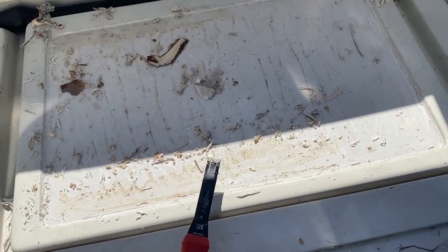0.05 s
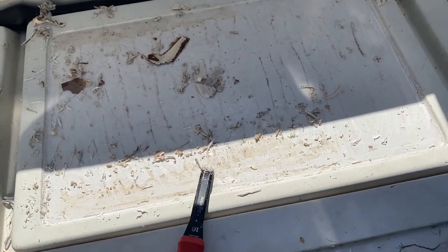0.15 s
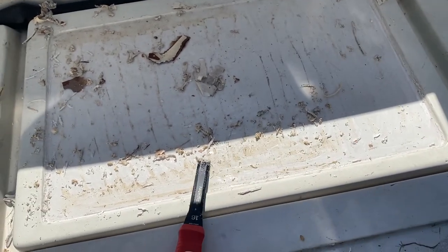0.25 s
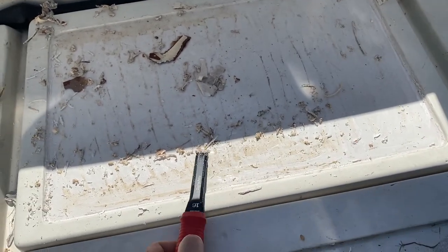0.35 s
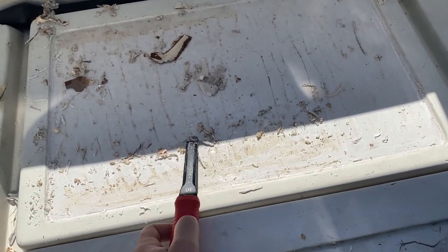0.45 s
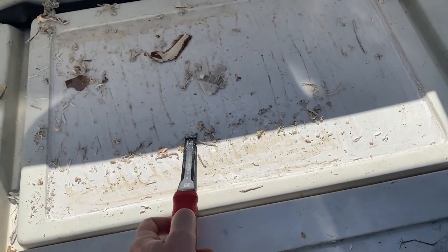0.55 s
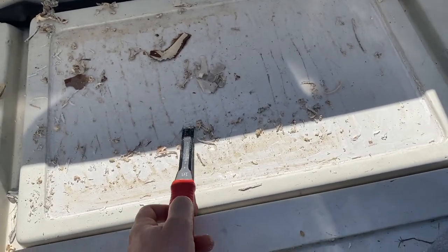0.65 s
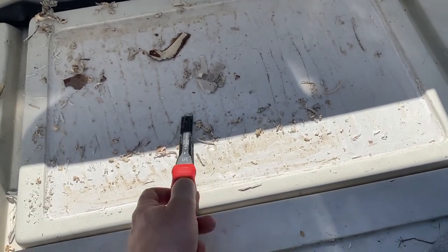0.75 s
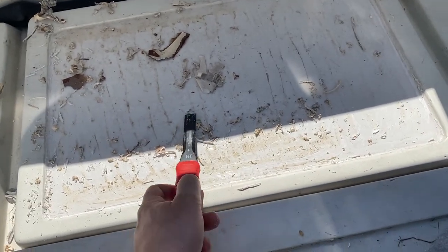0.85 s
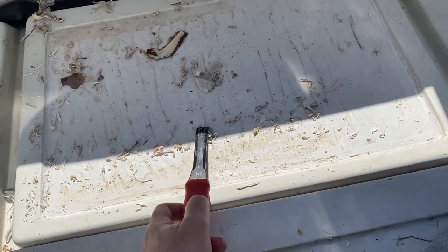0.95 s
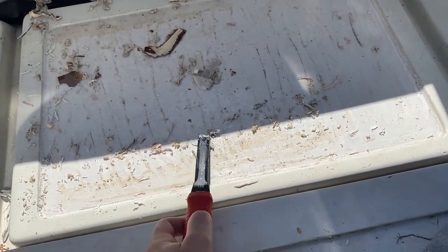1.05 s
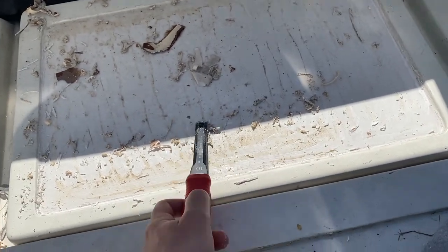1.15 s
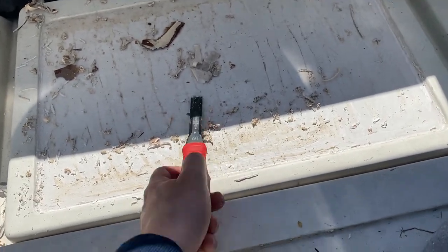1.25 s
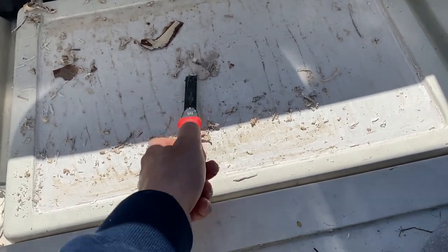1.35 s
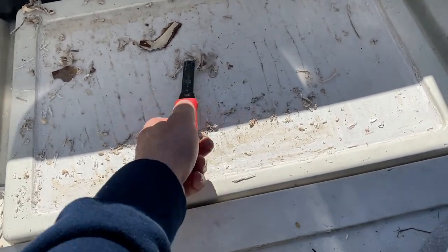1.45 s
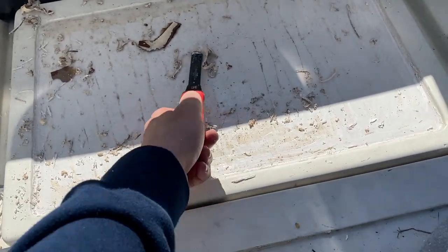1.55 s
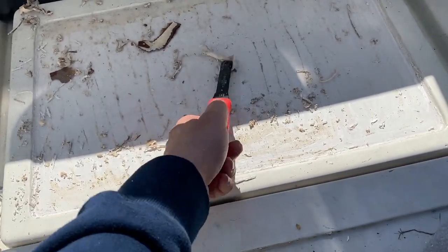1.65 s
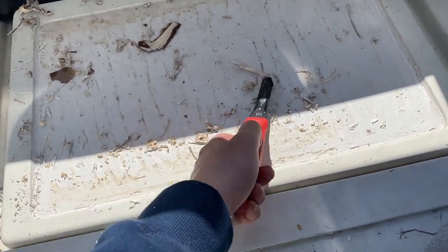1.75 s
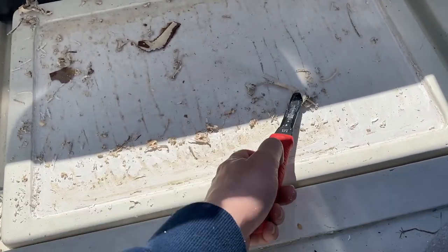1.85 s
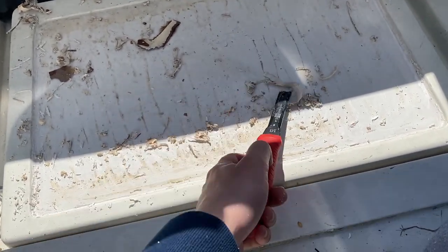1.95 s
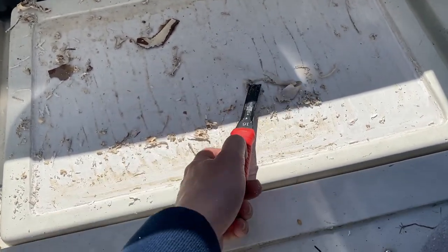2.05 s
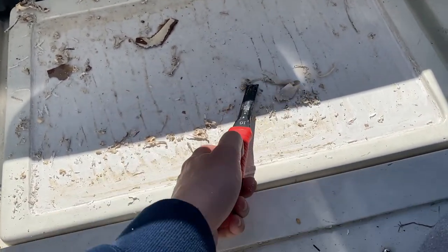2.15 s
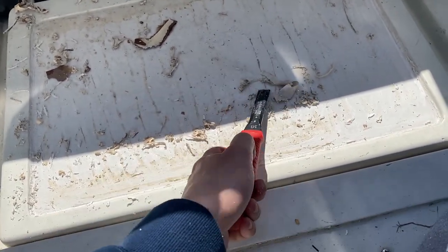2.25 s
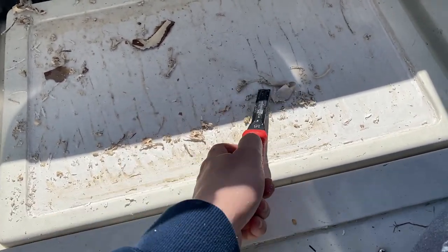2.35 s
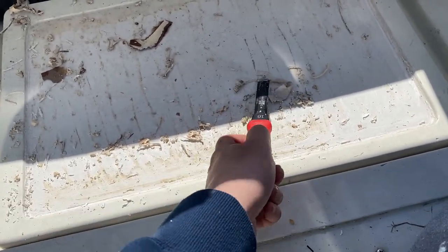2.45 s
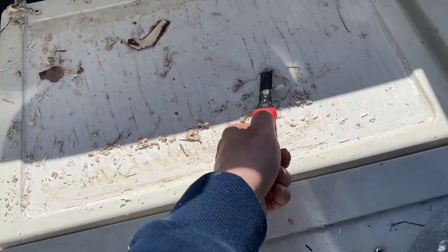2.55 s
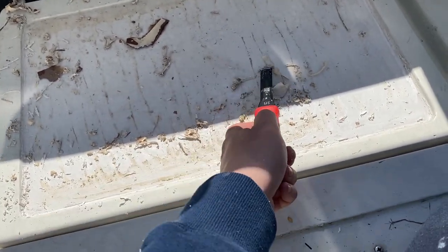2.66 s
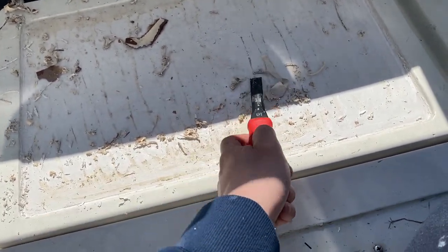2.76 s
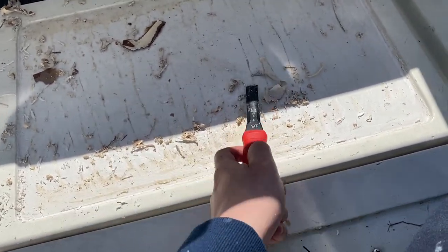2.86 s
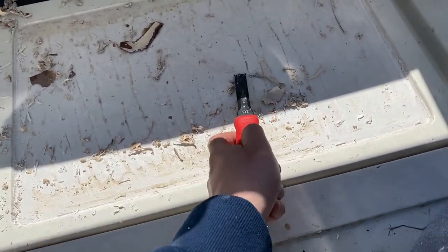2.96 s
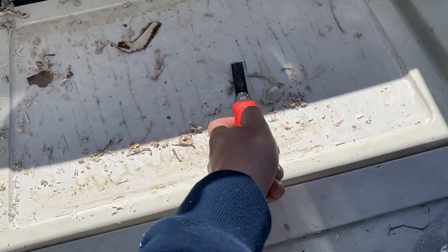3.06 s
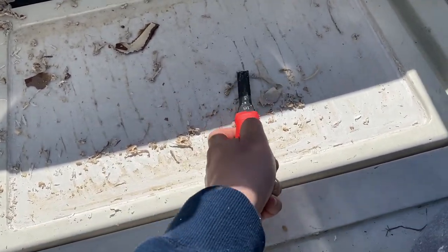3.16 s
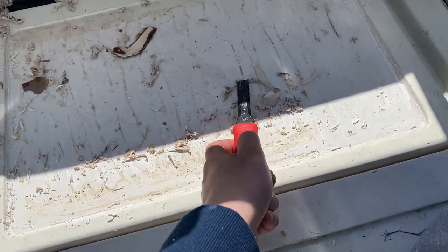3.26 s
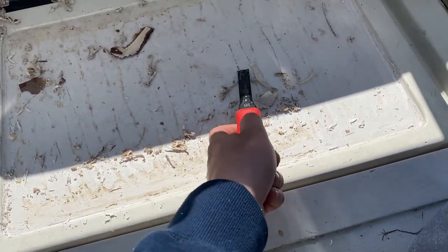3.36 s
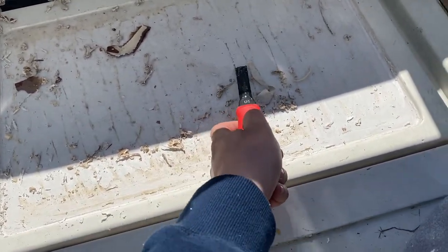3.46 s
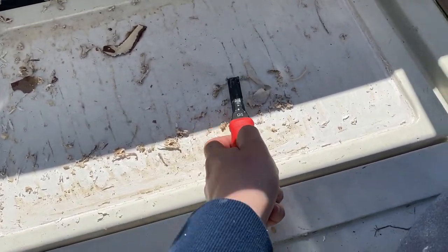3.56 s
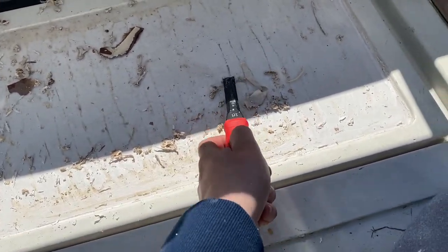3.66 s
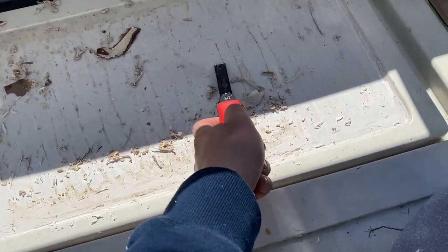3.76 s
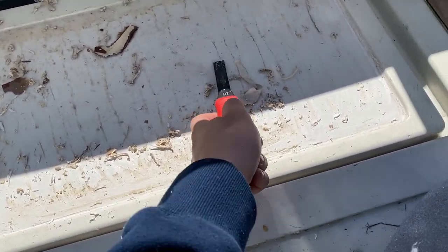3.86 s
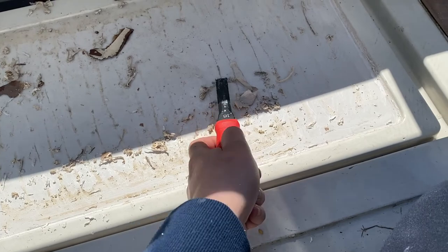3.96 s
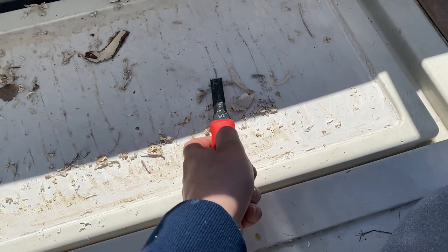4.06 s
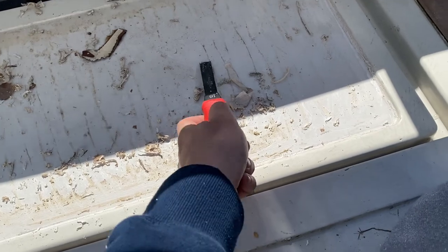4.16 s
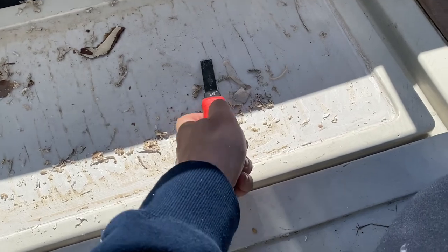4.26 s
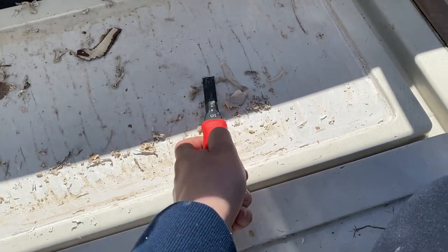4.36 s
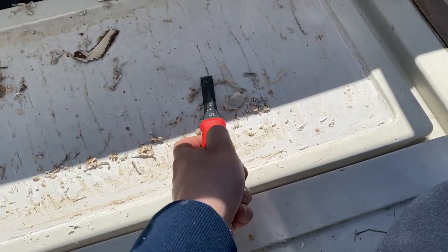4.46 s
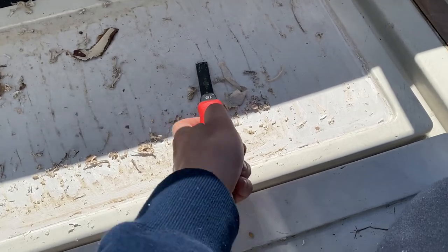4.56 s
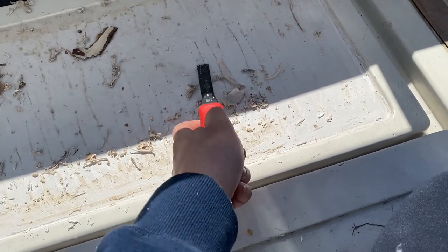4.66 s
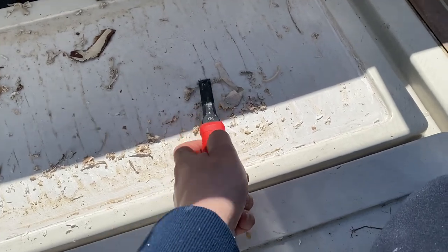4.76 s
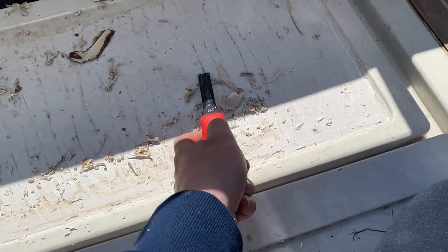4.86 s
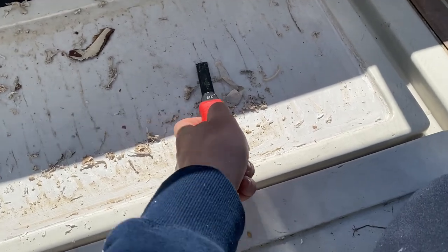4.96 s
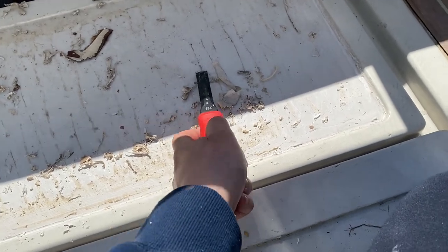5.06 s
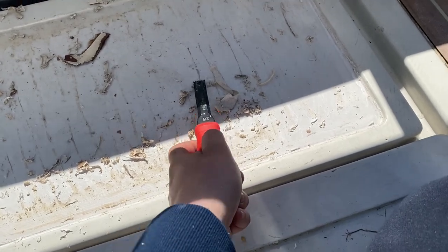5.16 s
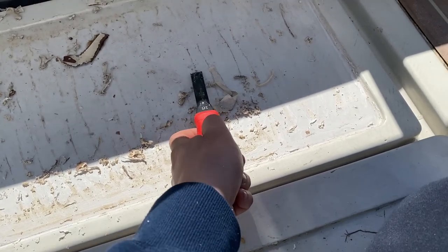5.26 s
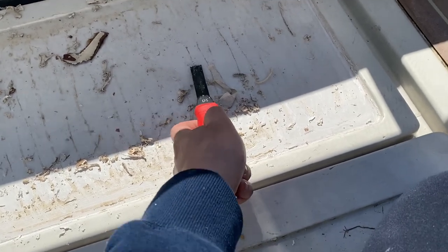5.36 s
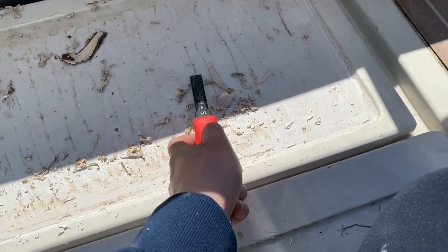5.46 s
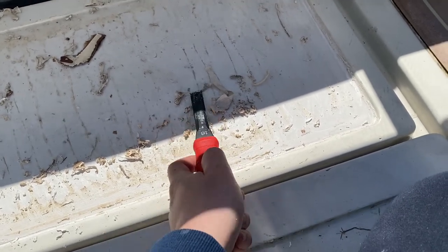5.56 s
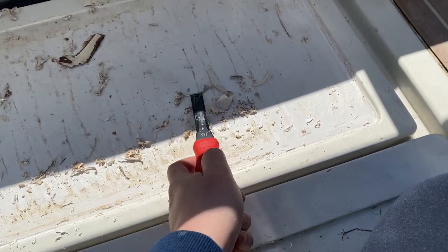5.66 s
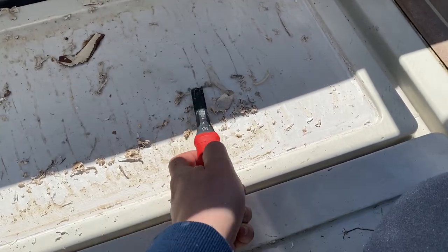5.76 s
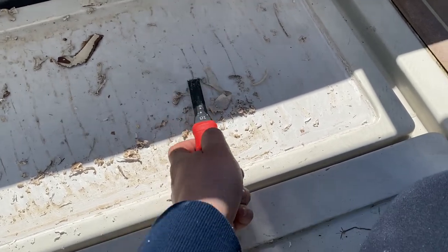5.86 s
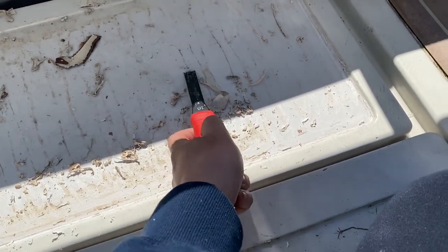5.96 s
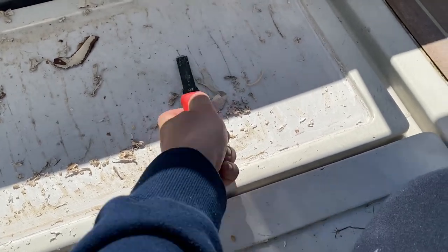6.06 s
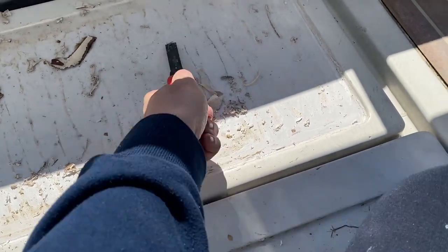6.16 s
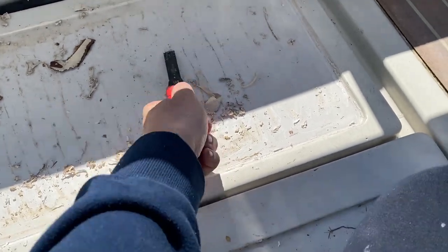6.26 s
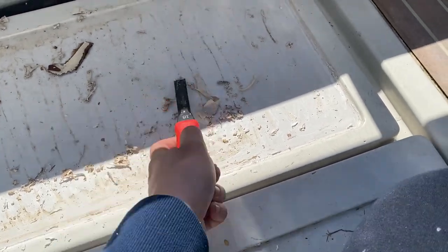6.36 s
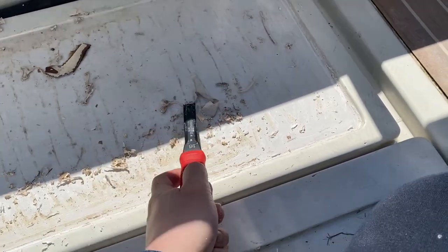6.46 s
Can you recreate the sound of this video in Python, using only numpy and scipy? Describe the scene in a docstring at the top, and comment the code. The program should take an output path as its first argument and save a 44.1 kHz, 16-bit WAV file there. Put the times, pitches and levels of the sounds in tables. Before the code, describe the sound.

Rapid dry scraping of a metal edge on a hollow plastic-like panel, with snags, crumb snaps and dull knocks, close up outdoors.

```python
"""Scraping glue off a hollow deck

A narrow steel blade is set down on a hollow fiberglass deck and scrapes off glue in quick strokes.
Random slips of its edge shake the hull, the deck panel, the deck skin and the blade, each a filter
that rings; the further force outweighs grit, the lower the steady chatter. Snags, snapping crumbs and
low thumps join in. Two close microphone ports hear it with short echoes in a quiet, rumbling yard."""
import sys
import numpy as np
from scipy import signal
from scipy.fft import rfft, irfft, next_fast_len
from scipy.io import wavfile
from scipy.ndimage import uniform_filter1d

SR = 44100
rng = np.random.default_rng(int(sys.argv[2]) if len(sys.argv) > 2 else 0)


def master(y):
    """Save y as 16-bit WAV."""
    cut = np.clip(np.atleast_2d(y).T, -1, 1)
    pcm = np.round(cut * 32767)  # scale
    wavfile.write(sys.argv[1], SR, pcm.astype(np.int16))


N = 287532  # length in samples
SIZE = next_fast_len(N + 8192)  # transform length with room for tails
FULL_HZ = np.fft.rfftfreq(SIZE, 1 / SR)
BODY_HZ = np.fft.rfftfreq(8192, 1 / SR)


def gain_of(db):
    """Turns decibels into gain."""
    return 10 ** (np.asarray(db) / 20)


def evened(x):
    """Scales a signal to rms 1."""
    return x / np.sqrt(np.mean(x ** 2) + 1e-20)


def read(points, hz):
    """Reads a spectrum table on a log-frequency axis."""
    f, value = np.transpose(points)
    return np.interp(np.log(hz + 1), np.log(f + 1), value)


def curve(rows, column):
    """Draws one column of a time table as a value for every sample."""
    rows = np.asarray(rows)
    return np.interp(np.arange(N) / SR, rows[:, 0], rows[:, column])


# Spectrum of the yard noise: [f/Hz, relative level/dB per Hz]
YARD_SPECTRUM = [(18, -59), (30, -41), (59, 13), (146, -61), (187, -17), (317, -1), (350, -10),
                 (536, -16.5), (578, -14), (761, -28.5), (12000, -53), (15600, -93), (22000, -120)]


def yard():
    """Faint distant rumble: filtered noise, partly shared by the two ports."""
    level_db = -54
    shared, own = rng.standard_normal(SIZE), rng.standard_normal((2, SIZE))
    colour = gain_of(read(YARD_SPECTRUM, FULL_HZ))
    rumble = irfft(rfft(shared + 0.69 * own) * colour, SIZE)[:, :N]
    return gain_of(level_db) * evened(rumble)


# Starting strength of each echo: [f/Hz, level/dB]
ECHO_LEVEL = [(100, -64), (400, -21), (1500, -29), (4000, -20.5), (9000, -16), (13000, -30)]
# Time the echoes take to fade by 60 dB: [f/Hz, fade time/s]
ECHO_FADE = [(100, 0.27), (1000, 0.12), (8000, 0.06)]


def cockpit(x):
    """Sparse reflections off the raised sides, different for each port, weak in bass and treble."""
    taps = rng.standard_normal((2, 11025)) * (rng.random((2, 11025)) < 0.05)
    taps[:, :90] = 0  # the first echo needs time to arrive
    hz, t, z = signal.stft(taps, SR, nperseg=256)
    fade_db = -60 * t / read(ECHO_FADE, hz)[:, None] + read(ECHO_LEVEL, hz)[:, None]
    tail = signal.istft(z * gain_of(fade_db), SR, nperseg=256)[1]
    return signal.oaconvolve(x[None], tail, axes=1)[:, :N]


# Phase of left over right; above 12 kHz the sides are held opposite: [f/Hz, phase/radians]
SIDE_PHASE = [(0, 0), (300, -.4), (480, -1.3), (1000, -1.0), (1330, -1.0), (1520, .5), (1900, .1),
              (2330, 0), (2930, 2.9), (3550, -.1), (3960, 1.5), (4300, 1.3), (4750, 3.1), (5340, 6.4),
              (6370, 7.3), (8800, 8.2), (10100, 8.7), (11000, 9.3), (12200, 9.42), (22050, 9.42)]
# Level of the left port over the right: [f/Hz, level/dB]
PORT_LEAN = [(60, -0.5), (110, 2), (200, 1.5), (380, 5), (700, -4.5), (1290, 0), (2380, -2.5), (4400, -0.5),
             (8120, 0.5), (15000, -0.5)]


def ports(x):
    """Makes the sound of the two ports: left and right differ in phase and level by frequency."""
    phase = np.interp(FULL_HZ, *np.transpose(SIDE_PHASE))
    half = gain_of(read(PORT_LEAN, FULL_HZ) / 2) * np.exp(0.5j * phase)  # half for each port
    return irfft(rfft(x, SIZE) * np.array([half, 1 / half]), SIZE)[:, :N]


# How far the phase between the ports drifts (rms): [f/Hz, drift/radians]
PHASE_DRIFT = [(300, 0.038), (600, 0.7), (1300, 1.14), (1900, 0.4), (2800, 2.28), (3700, 2.5), (4700, 0.61),
               (6500, 0.45), (9000, 0.36), (11500, 0.68), (13000, .1)]
# Where the edge works, from mid-panel 0 to the rim 1: [t/s, place 0-1]
EDGE_PLACE = [(0.2, 0.29), (0.36, 0.83), (1.2, 0.64), (2.2, 0.61), (2.4, 0.02), (2.9, 0.43), (3.3, 0.2),
              (5.6, 0.16), (6.52, 0.19)]
# Bands that gain or lose level near the rim: [f/Hz, width/Hz, level/dB]
RIM_BANDS = [(445, 225, -24), (726, 160, 10), (1030, 310, -10.5), (1372, 66, -20), (1570, 94, 10),
             (2120, 560, -3.5), (2275, 110, 12.5)]


def travel(pair):
    """As the edge travels, other modes are touched and the port paths change: drifting patches."""
    colour_db = 3.0
    hz, t, z = signal.stft(pair, SR, nperseg=512, noverlap=384)
    patches = rng.standard_normal((2, len(hz), len(t)))
    patches = uniform_filter1d(patches, 3, 1)
    patches = evened(uniform_filter1d(uniform_filter1d(patches, 14, 2), 14, 2))
    reach = (hz ** 2 / (hz ** 2 + 1270.0 ** 2))[:, None]  # long waves do not care where the edge is
    rim_db = sum(db * np.exp(-2 * ((hz - f) / width) ** 2) for f, width, db in RIM_BANDS)
    place_db = np.outer(rim_db, np.interp(t, *np.transpose(EDGE_PLACE)))
    place_db = place_db + colour_db * reach * patches[0]
    drift = read(PHASE_DRIFT, hz)[:, None] * patches[1]
    z *= gain_of(place_db) * np.exp(np.multiply.outer([0.5j, -0.5j], drift))
    return signal.istft(z, SR, nperseg=512, noverlap=384)[1][:, :N]


# The hand's shove stops short; hull and panel thump: [t/s, level/dB before a common lift, f/Hz]
LOW_THUMPS = [(0.177, -12.5, 191), (0.196, -27, 61.6), (0.697, -33, 100), (0.733, -20, 76.7),
              (0.815, -29, 111), (0.874, -30, 230), (0.881, -36, 104), (0.983, -21.5, 90),
              (1.104, -22.5, 79.5), (1.223, -50, 87), (1.374, -18, 218), (1.52, -25.5, 75),
              (1.606, -25, 240), (1.643, -19, 240), (1.695, -38, 147), (1.704, -26, 220), (1.773, -23, 240),
              (1.948, -31, 146), (2.06, -29, 101.5), (2.574, -31, 227), (2.83, -29, 52), (2.988, -28, 76.5),
              (3.228, -29, 90), (3.36, -29, 60), (3.397, -32, 300), (3.44, -28, 96), (3.683, -20.5, 88),
              (3.962, -27.5, 93), (4.044, -25, 200), (4.099, -31, 212), (4.285, -27, 200), (4.51, -43, 210),
              (4.655, -24, 190), (4.67, -30, 80.6), (4.907, -23.5, 91), (5.414, -27.5, 91.5),
              (6.029, -36, 102), (6.133, -16, 251), (6.304, -37, 114)]


def thumps():
    """Low swings of hull and panel: each sine swells at once and dies away over a few cycles."""
    turns, early_s, lift_db = 1.34, 0.00597, 5.5  # each starts a little ahead of its table time
    out = np.zeros(N + 4096)
    for s, db, hz in LOW_THUMPS:
        cycles = np.arange(4096) * hz / SR
        swell = cycles / turns * np.exp(1 - 2 * cycles / turns)
        start = round((s - early_s) * SR)
        out[start:start + 4096] += gain_of(db + lift_db) * np.sin(2 * np.pi * cycles) * swell
    return out[:N]


def blows(rows, level_db, length_s):
    """Short bursts of force: a first jerk and a dying noise rattle."""
    jerk = 0.48
    force, t = np.zeros(N + 2048), np.arange(2048) / SR
    rattle = rng.standard_normal((len(rows), 2048)) * np.exp(-t / length_s)
    rattle *= np.sqrt(length_s * SR / 2) / np.linalg.norm(rattle, axis=1, keepdims=True)
    rattle[:, 0] = jerk * np.sqrt(length_s * SR)
    for row, db, burst in zip(rows, level_db, rattle):
        start = round(row[0] * SR)
        force[start:start + 2048] += gain_of(db) * burst
    return force[:N]


# Crumbs of glue snapping off: [t/s, level/dB before a common trim]
GLUE_CRUMBS = [(0.3262, -33.5), (0.402, -39), (0.413, -37), (0.799, -44), (0.945, -22.5), (0.995, -23),
               (1.006, -26), (1.577, -36), (1.975, -34), (2.7017, -38), (3.2345, -48), (3.7579, -45),
               (3.8855, -32), (3.9893, -57), (4.2634, -27), (4.3125, -49), (4.621, -25), (4.751, -39),
               (4.959, -43), (5.005, -51), (5.428, -27), (5.458, -24), (5.542, -25), (6.123, -19.5),
               (6.3885, -14)]


def crumbs():
    """A crumb is small and snaps high: short bursts kept to the treble."""
    snaps = blows(GLUE_CRUMBS, np.transpose(GLUE_CRUMBS)[1] - 5, 0.0027)
    treble = signal.butter(2, (4500, 15500), "bandpass", fs=SR, output="sos")
    return signal.sosfilt(treble, snaps)


# The edge lands or snags: [t/s, blow level/dB, panel and blade level/dB against the blow],
# all before the trim of each part
EDGE_SNAGS = [(0.165, -13.5, -6, -26), (0.173, -10, 7, -38), (0.226, -27, 4, -44), (0.357, -33, 15, -22),
              (0.402, -38, -2, -20), (0.742, -28.5, -6, -34), (0.84, -41, -18, -11), (0.865, -33, 7, -8),
              (0.922, -32, 15.5, -9), (0.997, -30.5, -33, 2.5), (1.092, -39, -18, -27),
              (1.133, -27, -32, -31), (1.277, -22, -17, -32), (1.437, -32, 15.5, -4.5),
              (1.508, -35.5, -14, -34), (1.603, -28.5, 22, -27), (1.699, -31, 4, -1), (1.735, -43, 3, 8),
              (1.765, -37, 9, 1), (1.945, -34, 24.5, -9), (2.322, -45, 6, -8), (2.364, -34, -6, -30),
              (2.447, -30, -27, -27), (2.552, -34, -8, -9), (2.737, -34.5, -13, -23),
              (2.856, -39.5, 5, -36), (2.973, -42, -19, 14), (3.093, -32.5, -21, -5),
              (3.273, -26, -24, -11), (3.624, -42, 2, -25), (3.668, -27, -8, -30), (3.971, -29.5, 2, -13),
              (4.013, -35, 15, -25), (4.078, -46, -3, 10), (4.12, -40, -20, -19), (4.204, -34, -14, -14),
              (4.25, -25.5, -24, -0.5), (4.315, -31, 1, -28), (4.408, -36, 19, -24), (4.503, -43, -4, -18),
              (4.599, -49, -14, 11), (4.675, -42.5, -7, 15), (4.775, -52, -14, -28), (4.801, -25, -5, -13),
              (5.012, -35, 7, -1.5), (5.07, -29.5, -2, -26), (5.152, -44, 27.5, -33),
              (5.165, -24, -18, -34), (5.208, -26.5, -18, -6), (5.666, -32, -18, -20),
              (5.89, -19.5, -10, -30), (5.9021, -30, -8, -24), (6.124, -16, 5, -10), (6.19, -30.5, 6, -26),
              (6.224, -29.5, 12.5, -23.5), (6.31, -41, -3, 17), (6.376, -21.5, -20, 6.5)]


def snags(part, trim_db, length_s):
    """The blows of the landing or snagging edge, as one part of the body feels them."""
    _, blow_db, panel_db, blade_db = np.transpose(EDGE_SNAGS)
    against_blow_db = {"deck": 0, "panel": panel_db, "blade": blade_db}[part]
    return blows(EDGE_SNAGS, blow_db + against_blow_db + trim_db, length_s)


# Modes of deck and blade, before widening and pitch shift: [f/Hz, width/Hz, relative level/dB]
BODY_MODES = [(61.7, 11, -7), (230, 110, -26), (730, 45.4, -11), (1016.7, 82, -6), (1215, 20, -13),
              (1594, 118, -14.5), (2076, 15, -15.5), (2507, 196, -23), (2937, 38, -22.5),
              (3940, 177, -29.5), (6124, 190, -28), (6600, 830, -32), (9540, 290, -36), (55.7, 16.5, 10.5),
              (90, 12, -22), (256, 26, -1), (321, 63, -1.5), (432, 30, -4.5), (595, 137, -16.5),
              (864, 50, -42), (1472, 60, -14.5), (1620, 80, -46), (1840, 64, -17.5), (3580, 100, -30.5)]
# What sounds between the modes, before a common trim: [f/Hz, relative level/dB per Hz]
BETWEEN_MODES = [(15, -20), (30, -29), (59, 9.5), (157, -4), (212, 10.5), (439, -4.5), (489, -23),
                 (1020, -10.5), (1130, -15.5), (1560, -12), (1940, -21.5), (4030, -28.5), (4740, -25.5),
                 (6560, -27), (16000, -39)]


def body(lo_hz, hi_hz, pitch=1):
    """Ring of deck and blade between two frequencies, energy 1, starting at once (minimum phase)."""
    between_db, least_width_hz = -7.5, 36
    power = gain_of(2 * (read(BETWEEN_MODES, BODY_HZ) + between_db))
    for hz, width, db in BODY_MODES:
        width = max(width, min(least_width_hz, hz / 3))  # narrow modes are broadened so that none rings on as a long thin line
        power = power + gain_of(2 * db) / (1 + (2 * (BODY_HZ - pitch * hz) / width) ** 2) ** 2
    power = power / (1 + (lo_hz / (BODY_HZ + 1)) ** 8) / (1 + (BODY_HZ / hi_hz) ** 8)
    # folding the cepstrum forward puts all the sound after the blow
    cepstrum = irfft(np.log(power / power.max() + 1e-12) / 2)
    cepstrum[1:4096] *= 2
    cepstrum[4097:] = 0
    ring = irfft(np.exp(rfft(cepstrum)))
    return ring / np.linalg.norm(ring)


def slips(per_s, spread_db, lump_db, lump_s):
    """Stick and slip: random jerks of uneven size, coming in clumps as the edge crosses glue."""
    sizes = gain_of(spread_db * np.minimum(rng.exponential(1, N), 4)) * rng.standard_normal(N)
    happens = rng.random(N) < np.clip(per_s / SR, 0, 1)
    slow = signal.lfilter([1], [1, -np.exp(-1 / (lump_s * SR))], rng.standard_normal(N))
    return evened(sizes * happens * gain_of(lump_db * evened(slow)))


def catches():
    """The edge bites into a ridge of glue at once and tears free gradually."""
    per_s, catch_db, fade_s = 300, 2.0, 0.0036
    bites = rng.exponential(1, N) * (rng.random(N) < per_s / SR)
    hold = signal.lfilter([1], [1, -np.exp(-1 / (fade_s * SR))], bites)
    return gain_of(catch_db * np.minimum(hold, 3))


def resonate(x, hz, width_hz):
    """A resonance of gain 1 that follows the curve hz."""
    turn, r = np.exp(2j * np.pi * np.cumsum(hz) / SR), np.exp(-np.pi * width_hz / SR)
    return 2 * (turn * signal.lfilter([1 - r], [1, -r], x / turn)).real


def favour(force, ring, hz, share, width_hz):
    """A share of the force gathers round a moving pitch; loudness still follows the force alone."""
    near = resonate(resonate(force, hz, width_hz), hz, width_hz)
    grid = np.geomspace(hz.min() - 1, hz.max() + 1, 40)
    ring_power = abs(rfft(ring)) ** 2
    heard = [np.mean(ring_power / (1 + (2 * (BODY_HZ - f) / width_hz) ** 2) ** 2) for f in grid]
    share = np.clip(share, 0, 1)
    return np.sqrt(1 - share) * force + np.sqrt(share / np.interp(hz, grid, heard)) * near


def steadied(force, ring, span_s, amount):
    """Evens out the loudness: force is lowered where the ring swells and raised where it sinks."""
    swing = uniform_filter1d(signal.oaconvolve(force, ring)[:N] ** 2, max(round(span_s * SR), 8))
    swing = np.roll(swing, -round(span_s * SR / 4)) / swing.mean() + 0.032
    return evened(force / swing ** (np.clip(amount, 0, 1) / 2))


def ahead(x, lead_s):
    """Slow, heavy parts need time to swing up, so their push comes ahead of their sound."""
    return np.roll(x, -round(lead_s * SR))


def arches(starts, lengths, tops, level_db, power, even=0.12):
    """Power of each event over time: a skewed arch that peaks at the share top of its length."""
    out, tops = np.zeros((len(starts), N)), np.clip(tops * np.ones(len(starts)), 0.05, 0.95)
    for row, s, length, top, db in zip(out, starts, lengths, tops, level_db):
        part, count = row[round(s * SR):], round(length * SR)
        speed = np.sin(np.pi * (np.arange(count) / count) ** (np.log(0.5) / np.log(top)))
        speed = np.tanh(even * speed) / np.tanh(even)  # a larger even flattens the top
        part[:count] = (gain_of(2 * db) * abs(speed) ** (2 * power))[:len(part)]
    return out


SWELL_TOP, SWELL_POWER = 0.36, 1.8  # digs, rasps, shudders and shoves peak early


def swells(rows, steady, steady_hz):
    """Swells over a steady power: total gain, their share of it, and the pitch that weighs most."""
    start, length, db, hz = np.transpose(rows)
    each = arches(start, length, SWELL_TOP, db, SWELL_POWER)
    total = steady + each.sum(0)
    weight = steady ** 2 + (each ** 2).sum(0)
    pitch_hz = (steady ** 2 * steady_hz + hz @ each ** 2) / weight
    return np.sqrt(total), each.sum(0) / total, pitch_hz


# The arm shoves and the hull rocks: [start t/s, length/s, level/dB]
ARM_SHOVES = [(0.167, 0.075, -25), (0.727, 0.046, -46), (0.934, 0.16, -29.5), (1.074, 0.25, -31.5),
              (1.113, 0.25, -28.5), (1.17, 0.34, -30.5), (1.5, 0.093, -38), (1.633, 0.13, -34.5),
              (1.743, 0.17, -26.5), (1.918, 0.12, -35.5), (2.745, 0.16, -31.5), (2.953, 0.12, -32),
              (3.332, 0.093, -28.5), (3.607, 0.092, -29), (4.057, 0.088, -32), (4.26, 0.33, -38.5),
              (4.883, 0.1, -30), (5.192, 0.22, -33.5), (5.39, 0.24, -34), (5.646, 0.063, -32),
              (5.853, 0.14, -29), (6.004, 0.14, -22.5), (6.233, 0.16, -29.5), (6.381, 0.057, -24)]
# The arm resting on the deck: [t/s, level/dB]
ARM_WEIGHT = [(0.1, -78), (0.2, -27), (0.45, -50.5), (0.9, -42.5), (1.3, -42), (2.15, -44.5), (2.55, -38.5),
              (3.5, -37), (4.6, -40), (6.52, -40)]


def hull():
    """The hull rocks low under the resting arm and its shoves."""
    start, length, db = np.transpose(ARM_SHOVES)
    shoving = arches(start, length, SWELL_TOP, db, SWELL_POWER).sum(0)
    rock = np.sqrt(gain_of(2 * curve(ARM_WEIGHT, 1)) + shoving)
    ring = body(22.0, 164.5)
    rocking = slips(per_s=2700, spread_db=4.0, lump_db=-1.5, lump_s=0.042)
    rocking = steadied(rocking, ring, 0.039, 0.17)
    return signal.oaconvolve(ahead(rock, 0.013) * rocking, ring)[:N]


# The panel shudders under the edge: [start t/s, length/s, level/dB, f/Hz]
PANEL_SHUDDERS = [(0.164, 0.09, -32, 197), (0.173, 0.21, -42, 200.0), (0.342, 0.056, -44.5, 210),
                  (0.39, 0.088, -31.5, 193), (0.702, 0.13, -39, 232), (0.794, 0.049, -46, 184.0),
                  (0.859, 0.065, -32.5, 223), (1.272, 0.055, -30, 232), (1.342, 0.054, -28, 238),
                  (1.419, 0.071, -27.5, 199), (1.496, 0.092, -35, 229), (1.567, 0.33, -29.5, 231),
                  (1.584, 0.12, -26.5, 248), (1.686, 0.071, -22, 216), (1.748, 0.062, -22, 259),
                  (1.933, 0.12, -27.5, 222), (2.301, 0.12, -34, 309), (2.541, 0.099, -31, 328),
                  (2.62, 0.18, -46, 213), (2.72, 0.054, -35, 210), (2.925, 0.06, -32.5, 210),
                  (3.192, 0.11, -50, 207.0), (3.382, 0.25, -61.5, 192), (3.385, 0.048, -35, 330),
                  (3.581, 0.12, -47, 205), (3.716, 0.067, -37, 199), (4.084, 0.027, -33, 215),
                  (4.256, 0.088, -34.5, 186), (4.326, 0.24, -46.5, 290), (4.447, 0.14, -39, 224),
                  (4.622, 0.14, -37, 189), (4.986, 0.17, -40, 209), (5.355, 0.2, -47, 202),
                  (5.473, 0.011, -28.5, 219), (6.102, 0.093, -33, 241), (6.289, 0.13, -30, 205)]


def panel(press):
    """The deck panel flexes with the force, shudders round moving pitches and takes the snags."""
    flex_db, flex_power, flex_hz = -23, 0.61, 200  # between shudders it follows the force
    steady = gain_of(2 * flex_db) * press ** flex_power
    flex, _, panel_hz = swells(PANEL_SHUDDERS, steady, flex_hz)
    ring = body(129, 473)
    flexing = slips(per_s=3100, spread_db=2.0, lump_db=3.0, lump_s=0.014)
    flexing = favour(flexing, ring, panel_hz, 0.74, width_hz=166)
    flexing = steadied(flexing, ring, 0.02, 1.0)
    force = ahead(flex, 0.00048) * flexing + snags("panel", -3, 0.0034)
    return signal.oaconvolve(force, ring)[:N]


# The edge digs into glue and chatters: [start t/s, length/s, level/dB, f/Hz]
GLUE_DIGS = [(0.151, 0.043, -43, 1040), (0.165, 0.012, -18.5, 1000), (0.175, 0.032, -38, 770),
             (0.4, 0.072, -42.5, 730), (0.6, 0.28, -46, 1510), (0.86, 0.24, -51, 770),
             (1.26, 0.12, -35, 1250), (1.499, 0.041, -37.5, 855), (1.59, 0.061, -36, 777),
             (1.68, 0.092, -35, 870), (1.746, 0.057, -28, 740), (1.944, 0.092, -31.5, 800),
             (2.359, 0.04, -28, 530), (2.37, 0.079, -36.5, 1284), (2.438, 0.055, -33.5, 1500),
             (2.46, 0.089, -29, 560), (2.5, 0.071, -34, 1330), (2.535, 0.051, -23.5, 477),
             (2.72, 0.036, -45.5, 700), (3.266, 0.077, -31, 1030), (3.285, 0.086, -28, 1240),
             (3.37, 0.044, -33, 414), (3.659, 0.075, -43, 1016), (4.12, 0.017, -30, 1030),
             (4.24, 0.056, -38.5, 1020), (4.397, 0.071, -35, 1030), (4.69, 0.054, -41.5, 1120),
             (4.788, 0.059, -31.5, 970), (5.14, 0.051, -47, 1085), (5.2, 0.0032, -22.5, 1086),
             (5.655, 0.11, -39.5, 800), (5.72, 0.091, -30.5, 480), (5.77, 0.15, -33.5, 1030),
             (5.877, 0.055, -31.5, 570), (6.0, 0.06, -34, 1030), (6.12, 0.055, -29, 780),
             (6.205, 0.06, -40, 754), (6.362, 0.035, -26.5, 980)]


def deck(rub, press, bite, ticks):
    """The deck skin rings with chatter, which sinks where force far outweighs grit."""
    lo_hz, hi_hz = 426, 3200
    mid_hz, rim_hz, sink_per_db = 1030, 770, 0.02
    glide_share, dig_share = 0.27, 0.8  # how much gathers round the pitch, gliding or digging
    shift = 0.036  # share by which the two pitched copies of the deck lie below and above
    excess_db = np.maximum(10 * np.log10(press / rub) - 9.0, 0)
    glide_hz = (mid_hz + (rim_hz - mid_hz) * curve(EDGE_PLACE, 1)) * np.exp(-sink_per_db * excess_db)
    force, dug, chatter_hz = swells(GLUE_DIGS, press, glide_hz)
    share = glide_share + (dig_share - glide_share) * dug
    ring = body(lo_hz, hi_hz)
    chatter = slips(per_s=16000, spread_db=0.4, lump_db=2.0, lump_s=0.003)
    chatter = favour(chatter, ring, chatter_hz, share, width_hz=540)
    chatter = steadied(chatter, ring, 0.03, 0.47)
    digging = ahead(force, 0.00062) * (bite ** 0.5 * chatter + ticks) + snags("deck", -4, 0.0077)
    # a slowly wandering load fades between the lower and the higher deck
    slow = uniform_filter1d(uniform_filter1d(rng.standard_normal(N), 3000), 3000)
    load = np.pi / 4 * (1 + np.tanh(evened(slow)))
    lower = signal.oaconvolve(np.cos(load) * digging, body(lo_hz, hi_hz, 1 - shift))[:N]
    higher = signal.oaconvolve(np.sin(load) * digging, body(lo_hz, hi_hz, 1 + shift))[:N]
    return lower + higher


# The edge meets hard grit and the blade rasps: [start t/s, length/s, level/dB, f/Hz]
BLADE_RASPS = [(0.164, 0.016, -33.5, 3140), (0.4, 0.065, -50, 2400), (0.64, 0.018, -52, 5970),
               (0.68, 0.078, -53, 5500), (0.935, 0.05, -43, 6000), (0.97, 0.022, -42, 5700),
               (1.13, 0.034, -47.5, 2800), (1.25, 0.13, -55, 3200), (1.285, 0.06, -42, 5500),
               (1.6, 0.07, -66, 3000), (1.68, 0.082, -53, 4500), (2.41, 0.067, -43, 3000),
               (2.51, 0.056, -44, 2500), (2.97, 0.049, -33.5, 2490), (2.89, 0.07, -45, 5500),
               (3.12, 0.13, -40.5, 6000), (3.28, 0.039, -46, 3400), (3.68, 0.048, -42, 3670),
               (3.86, 0.071, -63, 6300), (4.08, 0.071, -43.5, 5070), (4.69, 0.037, -36, 2900),
               (4.83, 0.033, -43, 3920), (5.0, 0.05, -47, 4000), (5.16, 0.17, -48, 2800),
               (5.32, 0.011, -54.5, 6000), (5.43, 0.17, -40, 2730), (5.78, 0.21, -41, 3450),
               (5.95, 0.026, -34, 4170), (5.96, 0.23, -32.5, 3320), (6.24, 0.083, -30, 7300),
               (6.305, 0.025, -29.5, 7140), (6.35, 0.041, -30, 6400), (6.41, 0.037, -32, 3330)]


def blade(rub, bite, ticks):
    """The blade hisses over grit, rasps round moving pitches and rings from the snags."""
    sing_hz, sing_share, rasp_share = 3400, 0.07, 0.32
    rough, rasped, blade_hz = swells(BLADE_RASPS, rub, sing_hz)
    ring = body(2550, 19000)
    grit = slips(per_s=9000, spread_db=-0.5, lump_db=2.5, lump_s=0.015)
    grit = favour(grit, ring, blade_hz, sing_share + rasp_share * rasped, width_hz=3500)
    grit = steadied(grit, ring, 0.002, 0.58)
    force = rough * (bite * grit + ticks) + snags("blade", -4, 0.0048)
    return signal.oaconvolve(force, ring)[:N]


# Each push or pull speeds up and slows down in one arch: [start t/s, length/s,
# fastest point 0-1 (kept within 0.05-0.95), grit level/dB and deck force level/dB at full speed]
BLADE_STROKES = [(0.155, 0.22, 0.14, -65.5, -49), (0.265, 0.26, 0.47, -62, -49.5),
                 (0.542, 0.3, 0.51, -51.5, -46), (0.8, 0.27, 0.57, -45.5, -43.5),
                 (1.063, 0.29, 0.46, -47.5, -45), (1.242, 0.21, 0.28, -41, -39), (1.432, 0.23, 0, -51, -46),
                 (1.453, 0.41, 0.59, -44, -46), (1.938, 0.18, 0.22, -50.5, -40.5),
                 (2.099, 0.19, 0.63, -61, -49.5), (2.245, 0.38, 0.63, -46, -38),
                 (2.587, 0.25, 0.8, -55, -46.5), (2.667, 0.041, 0.4, -60, -49.5),
                 (2.827, 0.26, 0.52, -43.5, -40.5), (3.023, 0.22, 0.63, -39, -42.5),
                 (3.238, 0.18, 0.45, -42, -35), (3.347, 0.26, 0.76, -51.5, -46),
                 (3.605, 0.23, 0.42, -44, -43.5), (3.793, 0.21, 0.63, -45, -47.5),
                 (3.894, 0.31, 0.62, -43.5, -38), (4.112, 0.28, 0.69, -44, -45),
                 (4.378, 0.12, 0.6, -40, -37.5), (4.497, 0.077, 0.2, -42.5, -40.5),
                 (4.527, 0.23, 0.64, -43.5, -45.5), (4.756, 0.2, 0.45, -40, -37),
                 (4.911, 0.23, 0.65, -48.5, -49), (5.107, 0.22, 0.53, -41.5, -38.5),
                 (5.288, 0.28, 0.15, -55, -55.5), (5.308, 0.28, 0.69, -42.5, -40.5),
                 (5.562, 0.16, 0.56, -71, -61.5), (5.626, 0.48, 0.41, -43.5, -36),
                 (5.904, 0.27, 0.56, -31, -35), (6.158, 0.077, 0.72, -40.5, -55),
                 (6.217, 0.19, 0.28, -35.5, -43), (6.324, 0.19, 0.21, -37.5, -40),
                 (6.403, 0.13, 0.86, -61, -46)]


def scraping():
    """Strokes set grit and force; slips, catches and ticks then drive hull, panel, deck and blade."""
    evenness = 1.395  # how far a stroke holds its full speed
    grit_power, force_power = 3.03, 1.8  # how steeply grit and force follow the speed
    resting_grit_db, resting_force_db, tick_db = -88, -74.5, -11
    start, length, top, grit_db, force_db = np.transpose(BLADE_STROKES)
    rub = arches(start, length, top, grit_db, grit_power, evenness).sum(0)
    rub = rub + gain_of(2 * resting_grit_db)
    press = arches(start, length, top, force_db, force_power, evenness).sum(0)
    press = press + gain_of(2 * resting_force_db)
    bite = evened(catches())
    # single specks of glue crack under the edge
    ticks = gain_of(tick_db) * slips(per_s=110, spread_db=1.5, lump_db=5.5, lump_s=0.04)
    return hull() + panel(press) + deck(rub, press, bite, ticks) + blade(rub, bite, ticks)


def scene():
    """Blade on deck with its crumbs and thumps, their echoes, and the yard."""
    snaps = crumbs()
    struck = scraping() + snaps + thumps()
    centred = gain_of(-14.0) * snaps  # a faint copy of the snaps, equal on both sides
    return travel(ports(struck) + cockpit(struck)) + centred + yard()


def band_limit(x):
    """A steep low-pass at the top of the band."""
    return signal.sosfilt(signal.butter(12, 16520, fs=SR, output="sos"), x)


# Response of the microphones: [f/Hz, level/dB]
MICROPHONE_RESPONSE = [(7500, -2.5), (9000, -0.5), (10500, -3.5), (11500, -3), (13000, -17), (14500, -12),
                       (15600, -5.5), (16300, -25)]


def record(dry):
    """The microphones colour the treble, with a dip near 13 kHz and a fall at the top."""
    response = gain_of(read(MICROPHONE_RESPONSE, FULL_HZ))
    dulled = irfft(rfft(dry, SIZE) * response, SIZE)[:, :N]
    return band_limit(dulled)


dry = scene()
out = record(dry)
master(out)
```